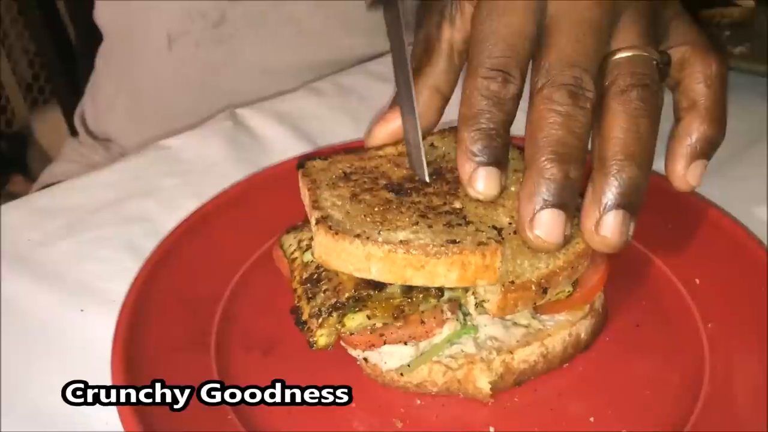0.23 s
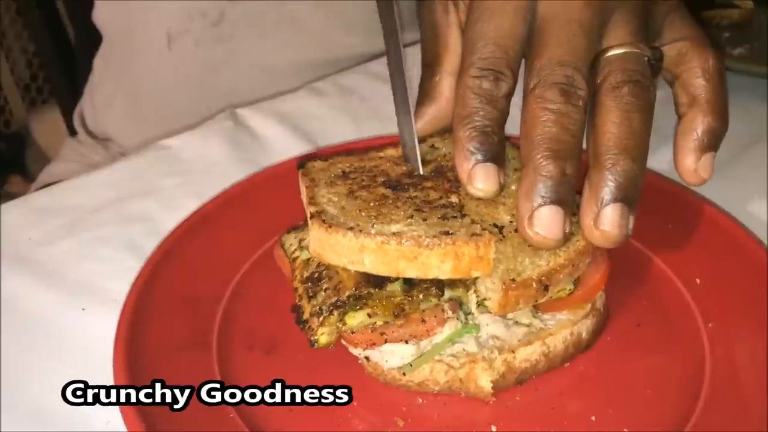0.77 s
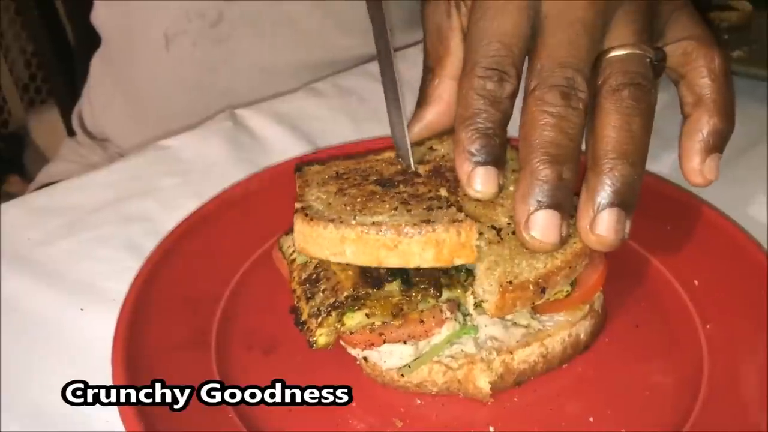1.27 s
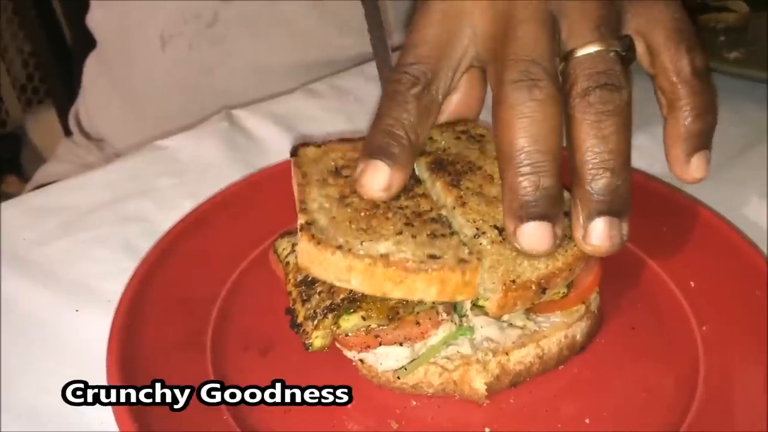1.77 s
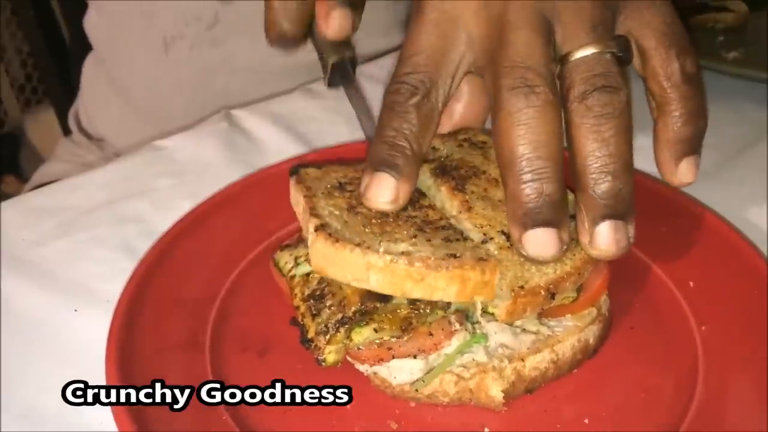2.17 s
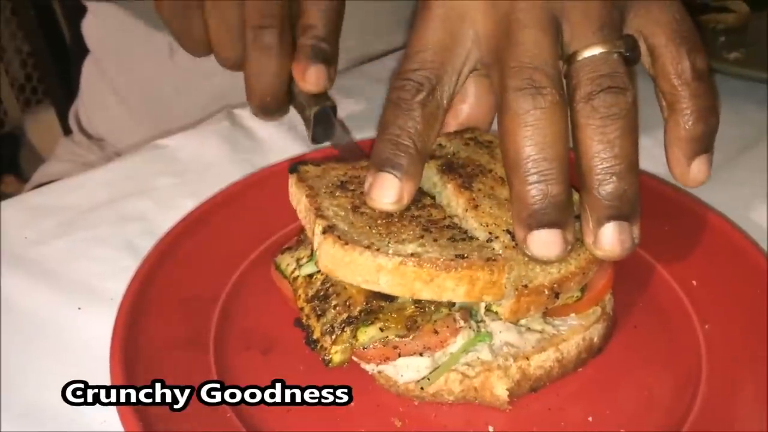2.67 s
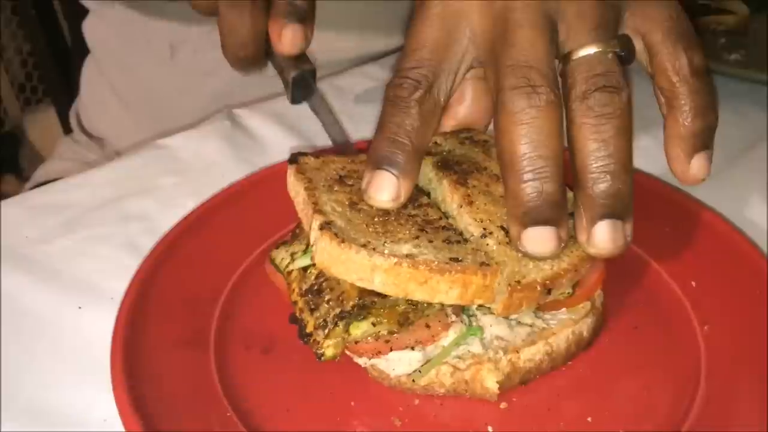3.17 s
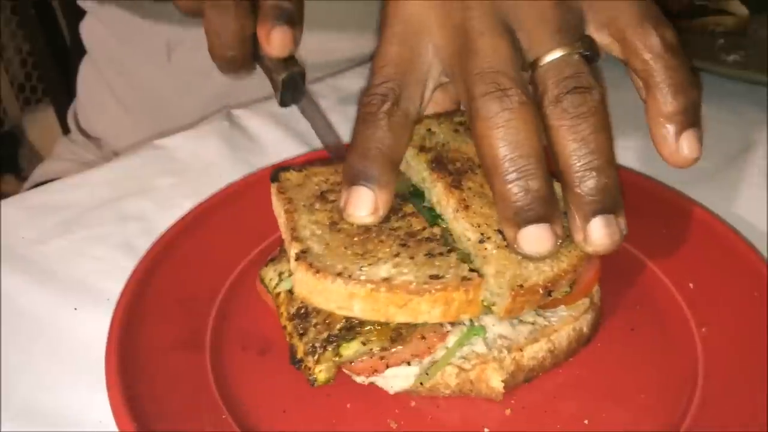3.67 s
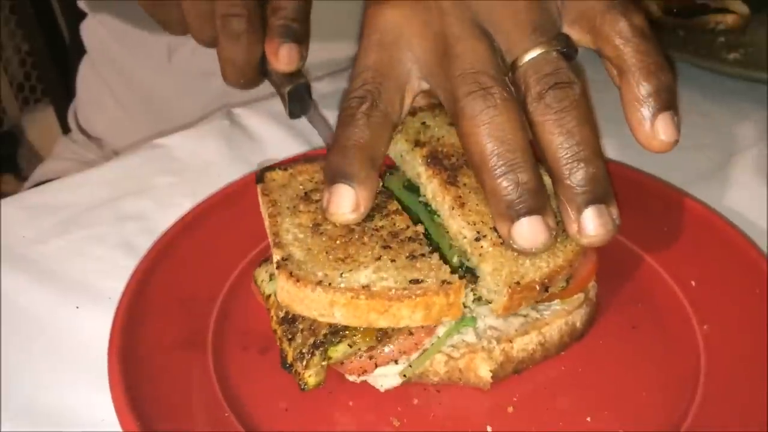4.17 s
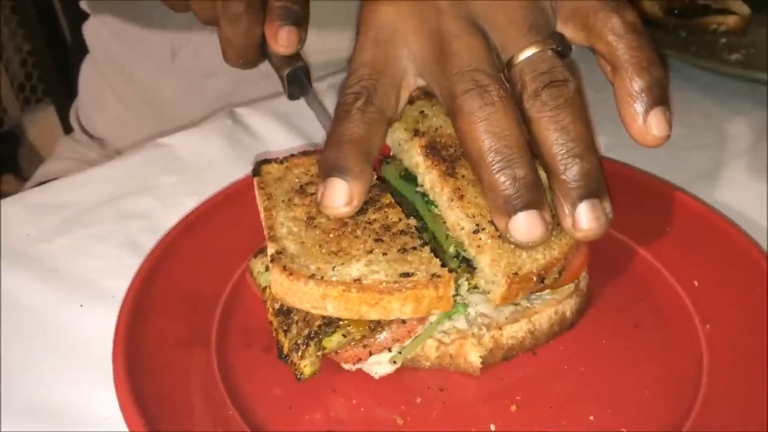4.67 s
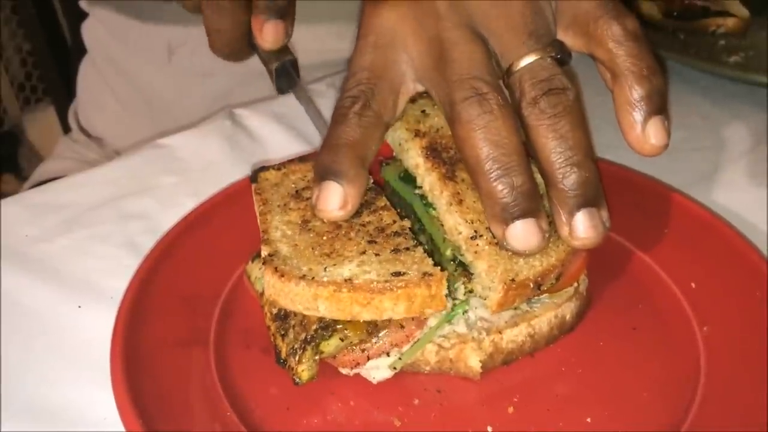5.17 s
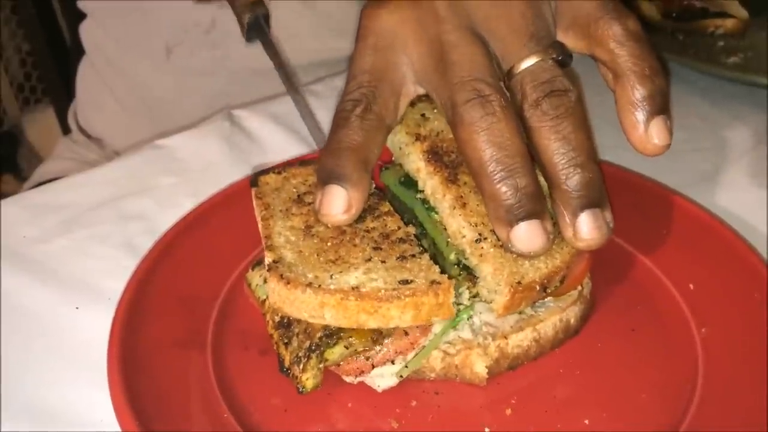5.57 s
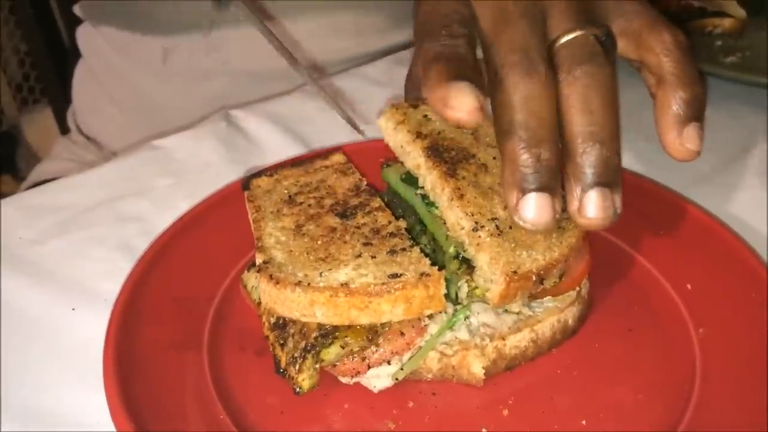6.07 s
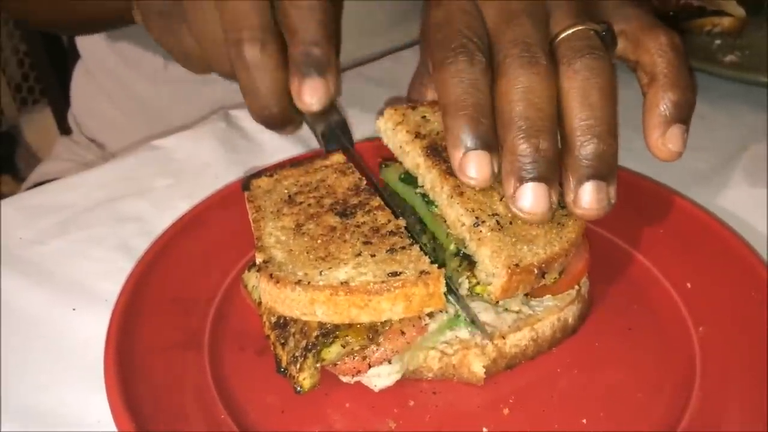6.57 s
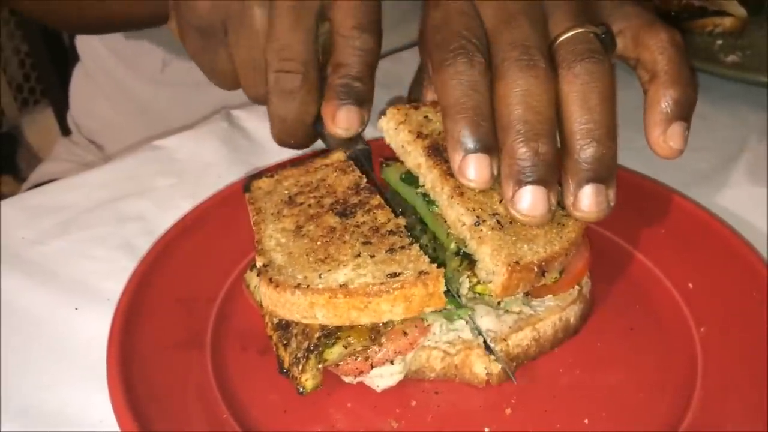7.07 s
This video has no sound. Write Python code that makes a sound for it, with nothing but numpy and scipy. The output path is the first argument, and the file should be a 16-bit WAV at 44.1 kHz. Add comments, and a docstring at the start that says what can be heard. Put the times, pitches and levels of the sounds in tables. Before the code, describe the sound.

Close up in a quiet kitchen, a knife saws through a toasted sandwich in short, uneven strokes, the crust crackling and snapping. The blade then reaches the ceramic plate and ticks and scrapes on it, with several sharp, ringing steel clinks, one brief screech and soft thumps on the tablecloth. A few faint ticks finish the cut. A low appliance rumble and faint electrical hum continue underneath.

```python
"""Sawing through a toasted sandwich

A knife saws through a toasted sandwich on a ceramic plate in a quiet kitchen. First the crust crumbles
and snaps under the teeth; then the blade reaches the plate and scrapes and ticks on it. Harder blows
set the steel ringing, and once it screeches over the glaze. Plate and bread thump softly on the cloth.
Under it all lies a steady appliance rumble with a mains hum."""
import sys
import numpy as np
from scipy import signal
from scipy.io import wavfile

SR = 44100
rng = np.random.default_rng(int(sys.argv[2]) if len(sys.argv) > 2 else 0)


def file_out(sig):
    """Save sig as 16-bit WAV at sys.argv[1]."""
    # one column per channel
    cols = np.atleast_2d(sig).T
    # limit, then scale
    lim = np.clip(cols, -1, 1)
    pcm = np.round(lim * 32767).astype(np.int16)
    wavfile.write(sys.argv[1], SR, pcm)


N = 322812
BLADE_ON_PLATE_S = 2.62
# The cutting has three layers: crunch (550-2000 Hz), grit (2-8 kHz) and fizz (above about 8 kHz).

# Tone curve of the appliance rumble: pitch_hz, relative_density_db
RUMBLE_SPECTRUM = [(22, -36.5), (31, -2), (50, -5.5), (65, 6), (100, 3), (250, 2.5), (400, -1),
                   (1000, -1.5), (1600, -8), (2500, -22), (4000, -40), (8000, -30.5), (13000, -37),
                   (16000, -42.5)]
# Partials of the mains hum: pitch_hz, level_db
HUM_PARTIALS = [(60, -72.5), (120, -64.5)]
# The hand keeps the bread rustling between strokes: time_s, grit_db, fizz_db
BREAD_RUSTLE = [(0, -65, -71), (2.398, -68, -81), (5.7, -66, -80), (6.001, -72, -88.5), (7.32, -68, -79.5)]
# Strokes of the knife: start_s, hold_s, grit_db, fizz_over_grit_db
KNIFE_STROKES = [(0.127, 0.044, -66, -3), (0.279, .04, -56.5, 2.5), (0.351, 0.044, -45.5, -1),
                 (0.429, 0.032, -56, -2), (0.658, 0.027, -53.5, -2.5), (.82, .02, -60, -7),
                 (0.876, .04, -48, 3), (0.949, 0.031, -46, -0.5), (1.194, 0.054, -52.5, -3),
                 (1.415, 0.065, -46.5, -8.5), (1.522, .03, -57, -9.5), (1.787, 0.054, -59, 3),
                 (1.969, 0.0075, -57, 4.5), (2.102, 0.011, -55, 5), (2.219, 0.045, -56, -2),
                 (2.322, 0.0062, -62.5, 1), (2.445, .02, -62.5, -7), (2.649, .03, -63, -5.5),
                 (2.712, 0.028, -62, -8), (2.808, 0.014, -51.5, -1), (2.862, 0.0068, -41.5, -16),
                 (2.963, 0.011, -37.5, -18), (3.109, .03, -61, -11), (3.341, 0.046, -56.5, -9.5),
                 (3.433, 0.006, -39.5, -0.5), (3.509, 0.0076, -57, -20), (3.639, .02, -55, -15),
                 (3.698, .02, -56, -6.5), (3.97, 0.014, -58.5, -6), (4.18, 0.017, -56.5, -11),
                 (4.432, .02, -63, -15), (4.632, .03, -59.5, -3.5), (4.69, .015, -56, -6),
                 (4.787, 0.006, -43.5, -8), (4.863, 0.043, -42, -21), (4.935, 0.0033, -33, -3.5),
                 (4.981, 0.057, -38.5, -19.5), (5.197, 0.022, -49.5, -20), (5.318, 0.023, -49, -16),
                 (5.491, 0.037, -45.5, -29), (5.592, 0.0043, -37.5, -29), (6.46, .02, -65, -7),
                 (6.546, .04, -67, -23.5), (6.784, .015, -62, -3), (7.123, 0.022, -58, -18),
                 (7.292, 0.023, -60, -4)]
# Featured snaps of the crust: start_s, grit_peak_db, pitch_hz, fizz_over_grit_db
CRUST_SNAPS = [(.0355, -44.5, 4000, 2), (.0494, -40, 2740, 1), (.1283, -31.5, 4330, 0.5),
               (.1617, -31, 6100, 1), (.2888, -39.5, 3320, 7), (.3163, -38, 3500, 7),
               (.3227, -26, 2750, -2.5), (.3523, -24, 2600, -14.5), (.358, -33.5, 2400, -0.5),
               (.3762, -31, 4570, 1), (.3973, -35.5, 4770, 9), (.401, -31, 6300, 0),
               (.4639, -33.5, 4260, -11), (.8174, -43.5, 4750, 2), (.855, -42.5, 4390, -9),
               (.8688, -28, 4420, -1), (.8846, -34, 6400, -6.5), (.8888, -26, 5630, 0.5),
               (.9103, -28.5, 4870, -0.5), (.9173, -37, 4500, -5), (.9451, -33, 4160, -11),
               (.9571, -29, 4760, 3.5), (.9799, -29.5, 4650, 6), (.9843, -34, 4590, -5),
               (1.1195, -43.5, 4610, 8), (1.1746, -36.5, 5130, -1.5), (1.2053, -40, 2680, -1),
               (1.2319, -29.5, 3110, 3.5), (1.3883, -26.5, 4030, -8), (1.3918, -28.5, 4430, -10.5),
               (1.4079, -28, 4930, 2.5), (1.4211, -29, 4600, -13.5), (1.4272, -25.5, 4900, -4.5),
               (1.4364, -28.5, 3160, -1), (1.4503, -32, 4120, -15), (1.461, -40, 5020, -8),
               (1.4675, -23, 5500, -2), (1.4715, -17.5, 5970, -14), (1.4907, -18.5, 5250, -13),
               (1.496, -30, 4090, 3), (1.5129, -31.5, 5650, 1), (1.5501, -35, 3580, -12),
               (1.6653, -45, 6300, -2.5), (1.7643, -33.5, 3570, 5.5), (1.8092, -43.5, 5920, -2),
               (1.9237, -44.5, 5470, -4), (1.9533, -36, 4460, 5.5), (2.0371, -34.5, 4480, -10),
               (2.0732, -26, 4060, 0), (2.1051, -29.5, 4030, -14), (2.1106, -28.5, 4240, -1),
               (2.1779, -32.5, 4800, 2.5), (2.1888, -51.5, 4350, 8), (2.2074, -31, 6660, -7),
               (2.2131, -30.5, 4200, 0), (2.2527, -31.5, 5500, -7), (2.2575, -41, 4730, -3.5),
               (2.3199, -36, 6430, -14), (2.3293, -38.5, 6160, 2.5)]
# Featured ticks of the blade on the plate: start_s, grit_peak_db, pitch_hz, fizz_over_grit_db
PLATE_TICKS = [(2.6651, -42, 5300, -8), (2.7181, -32, 6350, -15.5), (2.8066, -33.5, 5440, -5.5),
               (2.8254, -32.5, 4650, -10), (2.867, -33, 3550, -15), (2.9173, -23, 2970, -18.5),
               (2.9211, -23, 2530, -19), (2.9486, -10, 3920, -22), (2.9602, -5, 3760, -37),
               (3.0946, -47, 5110, 0), (3.3053, -44.5, 3010, -21.5), (3.3459, -37.5, 5640, -6),
               (3.3822, -41, 2770, -10), (3.3968, -30, 2580, -22), (3.4186, -41, 3020, -13.5),
               (3.4265, -18, 3050, -37.5), (3.4396, -18, 4350, -23), (3.4791, -21.5, 3300, -35),
               (3.6362, -36.5, 2590, -4.5), (3.684, -34, 3510, -29.5), (4.1605, -41.5, 3960, -21.5),
               (4.5204, -31.5, 5420, -12.5), (4.6787, -40.5, 4970, -13), (4.6926, -39, 3300, -10.5),
               (4.7017, -36.5, 3350, -11), (4.7505, -39, 4400, -9.5), (4.771, -33, 4050, -7.5),
               (4.785, -24, 2800, -27), (4.8336, -36.5, 2420, -8), (4.8761, -31.5, 2760, -17.5),
               (4.8909, -28, 2960, -1), (4.9015, -20.5, 3860, -23.5), (4.9056, -23, 2480, -21),
               (4.933, -6.5, 4530, -14), (4.9533, -24.5, 3210, -25), (4.9753, -8.5, 3950, -39),
               (5.0164, -18, 4260, -32), (5.0299, -22.5, 4150, -17.5), (5.0562, -20.5, 4010, -32),
               (5.1928, -31.5, 4250, -17), (5.2135, -31.5, 3360, -12), (5.2541, -40, 2570, -11.5),
               (5.3138, -35, 2520, -8), (5.3429, -33, 3710, -17), (5.3527, -32.5, 2530, -15.5),
               (5.4558, -31.5, 3390, -20), (5.514, -23.5, 4010, -18.5), (5.5323, -30.5, 2630, -12.5),
               (5.5379, -32, 2620, -13), (5.5866, -20.5, 2640, -27), (5.5983, -22, 4040, -27),
               (5.6071, -30, 2440, -29), (5.688, -40.5, 2590, -4.5), (6.7633, -37.5, 3520, -10),
               (6.7928, -37, 4810, -8), (6.9728, -43.5, 5400, 2), (7.0122, -44.5, 2830, 2.5),
               (7.0844, -31.5, 4900, -7), (7.1166, -24, 3250, -18), (7.1866, -40, 2840, -2.5),
               (7.3165, -41, 2410, -11)]
# Modes of the plate, held down by hand and bread: pitch_hz, base_width_hz, gain_db
PLATE_MODES = [(688, 11, 1.5), (2070, 30, -20), (2430, 87, 3), (3075, 62, -4), (3632, 27, -4),
               (4190, 69, -18.5), (4865, 39, -6), (5460, 45, 4.5), (6340, 360, -6.5), (7460, 70, -14.5),
               (8250, 570, -7), (9520, 63, -25), (10300, 84, -16), (12400, 63, -15.5)]
# Plate and bread thumping on the cloth: start_s, level_db, pitch_hz, t60_s
CLOTH_THUMPS = [(0.411, -40.5, 165, 0.15), (1.45, -37, 210, 0.095), (1.526, -35.5, 144, 0.051),
                (1.639, -44, 211, 0.14), (2.076, -21, 360, 0.0096), (2.865, -30.5, 663, 0.086),
                (2.947, -30.5, 354, 0.082), (2.962, -33, 230, 0.19), (3.485, -41.5, 214, 0.2),
                (3.47, -36.5, 704, 0.12), (4.935, -19.5, 269, 0.05), (4.939, -28, 683, .08),
                (4.974, -34, 175, 0.35), (5.603, -35, 706, 0.024)]
# Blows that ring the blade: start_s, peak_db, pressure (0-1), ring_share (0-1), contact_s, clack_re_peak_db
BLADE_BLOWS = [(2.9615, -7.5, 0.93, 0.083, 0.00045, -35), (3.4375, -42, 0.85, 0.31, 0.00083, -23),
               (3.4795, -25.5, 0, 0.21, 0.0012, -27), (3.516, -34.5, 0.05, 0.52, 0.004, -21.5),
               (4.9742, -4.5, 0.81, 0.3, 0.0011, -22), (5.034, -19, 0.72, 0.49, 0.0032, -13),
               (5.055, -17.5, 0.53, 0.22, 0.002, -5), (5.483, -24, 0.4, 0.45, 0.00066, -20.5),
               (5.7005, -8.5, 0.07, 0.88, 0.0017, -3.5)]
# Bending modes of the blade: free_hz, free_db, pressed_hz, pressed_db, full_t60_s
BLADE_MODES = [(662, -31, 680, -30, .2), (1453, -36, 1460, -36, .2), (2315, -3, 2309, -22, .21),
               (3268, 0, 3252, -13, .15), (4362, 2, 4495, 2, .11), (5609, -18, 5690, -7, .14),
               (6300, -48, 6412, -19, .09), (6993, -24, 7090, -24, .22), (7623, -48, 7687, -32, .15),
               (8522, -23, 8613, -20, .14), (9500, -48, 9577, -28, .09), (10190, -24, 10240, -24, .13),
               (12000, -30, 12030, -21, .12), (12500, -45, 12560, -30, .07), (13940, -33, 14040, -19, .08)]
# Envelope of the pressed blade screeching over the glaze: time_s, level_db
SCREECH_ENVELOPE = [(4.975, -60), (4.985, -34), (5.01, -31), (5.04, -36), (5.06, -54), (5.073, -65)]


def from_db(db):
    """Gain for a level in dB."""
    return 10 ** (np.asarray(db) / 20)


def rms_one(x):
    """Normalises to rms 1."""
    return x / np.sqrt(np.mean(x ** 2) + 1e-20)


def peak_one(x):
    """Normalises to peak 1."""
    return x / np.max(np.abs(x))


def band(x, low_hz, high_hz):
    """Gentle band-pass."""
    return signal.sosfilt(signal.butter(2, [low_hz, high_hz], "band", fs=SR, output="sos"), x)


def resonance(x, hz, width_hz):
    """Two-pole resonator with unity gain at its peak."""
    r = np.exp(-np.pi * width_hz / SR)
    gain = (1 - r * r) / 2
    return signal.lfilter([gain, 0, -gain], [1, -2 * r * np.cos(2 * np.pi * hz / SR), r * r], x)


def drift(rate_hz):
    """Smooth random modulation with rms 1."""
    r = np.exp(-2 * np.pi * rate_hz / SR)
    return rms_one(signal.lfilter([1], [1, -2 * r, r * r], rng.standard_normal(N + SR))[SR:])


def add(out, start_s, sound):
    """Drops a short sound onto the track."""
    at = round(start_s * SR)
    out[at:at + len(sound)] += sound[:N - at]


def three_bands(x, tilt_hz):
    """Splits into crunch, grit and fizz; the outer bands are flipped so that the crossovers add up."""
    r = np.exp(-2 * np.pi * tilt_hz / SR)
    grit = signal.lfilter([1 - r], [1, -r], band(x, 2000, 8000))
    return -band(x, 550, 2000), grit, -band(band(x, 7500, 18000), 5000, 14000)


def room_tone():
    """The kitchen bed: appliance rumble in flickering third-octave bands, and a wavering mains hum."""
    edges_hz = 22 * 2 ** np.arange(0, 9.7, 1 / 3)
    curve_hz, curve_db = np.transpose(RUMBLE_SPECTRUM)
    white = rng.standard_normal((2, N + SR))
    flicker = [drift(8.1), drift(17), drift(11)]
    rumble, t = np.zeros(N), np.arange(N) / SR
    for k, (low, high) in enumerate(zip(edges_hz, edges_hz[1:])):
        level_db = np.interp(np.log(low * high) / 2, np.log(curve_hz), curve_db)
        flicker_db = (1 + 81 / low) ** 0.47 * flicker[k % 3]   # the lows move most
        rumble += from_db(level_db + flicker_db) * band(white[k % 2], low, high)[SR:]
    hum = sum(from_db(db + 3 + 3.5 * drift(15)) * np.sin(2 * np.pi * hz * t) for hz, db in HUM_PARTIALS)
    return from_db(-53) * rms_one(rumble) + hum


def stroke_levels(t):
    """Grit and fizz envelopes in dB: each stroke swells, holds and dies, adding power to the rustle."""
    rise_db_per_s, fall_db_per_s, fizz_steepness = 336, 266, 3.9
    times_s, *rustle_db = np.transpose(BREAD_RUSTLE)
    grit_power, fizz_power = [from_db(2 * np.interp(t, times_s, db)) for db in rustle_db]
    for start_s, hold_s, grit_db, fizz_db in KNIFE_STROKES:
        before_s, after_s = np.maximum(start_s - t, 0), np.maximum(t - start_s - hold_s, 0)
        down_db = np.minimum(rise_db_per_s * before_s + fall_db_per_s * after_s, 100)
        grit_power += from_db(2 * (grit_db - down_db))
        fizz_power += from_db(2 * (grit_db + fizz_db - fizz_steepness * down_db))
    return 10 * np.log10(grit_power), 10 * np.log10(fizz_power)


def grains(per_s, spread_db):
    """Tiny fractures of uneven size, arriving in clumps over a fine hiss that swells with them."""
    sizes = from_db(spread_db * np.minimum(rng.exponential(1, N), 4)) * rng.choice([-1, 1], N)
    clumps = drift(30)
    breaks = rng.random(N) < per_s * from_db(5 * clumps) / SR
    return rms_one(sizes * breaks) + .45 * from_db(3 * clumps) * rng.standard_normal(N)


def held_plate(x, ring_db):
    """The dry contact sound plus the damped plate modes that it drives."""
    modes = sum(from_db(db) * (-1) ** k * resonance(x, hz, width_hz + 15)
                for k, (hz, width_hz, db) in enumerate(PLATE_MODES))
    return x + from_db(ring_db) * modes


def sawing():
    """Crumbs break all along the stroke; once the blade is through and bears down, the plate colours them."""
    t = np.arange(N) / SR
    grit_db, fizz_db = [np.interp(t, t[::32], db) for db in stroke_levels(t[::32])]
    crumbs = grains(per_s=1500, spread_db=3.5)
    on_plate = t > BLADE_ON_PLATE_S
    bearing = on_plate * np.clip((grit_db + 64) / 14, 0, 1)
    crunch_db = grit_db + np.where(on_plate, -11, -5)   # soft bread sounds deeper than the hard plate
    loose = three_bands(crumbs, tilt_hz=2930)
    pressed = three_bands(held_plate(crumbs, ring_db=12.5), tilt_hz=6000)
    return sum(from_db(level_db) * ((1 - bearing) * rms_one(plain) + bearing * rms_one(ringing))
               for plain, ringing, level_db in zip(loose, pressed, [crunch_db, grit_db, fizz_db]))


def small_cracks(count):
    """Cues for small random cracks that crowd into strong strokes and follow their level and fizz."""
    when, pitch, size, brightness = rng.random((count, 4)).T
    t = np.arange(0, N, 32) / SR
    density = from_db(.7 * np.minimum(stroke_levels(t)[0], -48))
    progress = np.cumsum(density)
    start_s = np.interp(when, progress / progress[-1], t)
    grit_db, fizz_db = stroke_levels(start_s)
    peak_db = grit_db + 7.5 + 4 * np.log(size + 0.018)
    fizz_over_grit_db = fizz_db - grit_db + 3.4 + 12 * (brightness - .5)
    return np.c_[start_s, peak_db, 2500 + 3700 * pitch, fizz_over_grit_db]


def loose_crumbs(count):
    """Cues for loose crumbs: faint, very bright pinpricks scattered over the whole scene."""
    when, pitch, size = rng.random((count, 3)).T
    peak_db = -58.5 + 6.5 * np.log(size + .02)
    fizz_over_grit_db = np.full(count, 10)
    return np.c_[when * N / SR, peak_db, 4000 + 3000 * pitch, fizz_over_grit_db]


def cracks(cues, crunch_db, crunch_slope, scatter_db, ring_db, broadband, base_t60_s):
    """Each crack is a sharp noise burst with its own pitch, crunch and fizz; big ones last longer."""
    out, t = np.zeros(N), np.arange(1024) / SR
    offsets_db = scatter_db * rng.standard_normal(len(cues))
    for (start_s, peak_db, hz, fizz_db), offset_db in zip(cues, offsets_db):
        t60_s = base_t60_s * from_db(0.033 * (peak_db + 32.5))
        burst = rng.standard_normal(len(t)) * from_db(-60 * t / t60_s)
        crunch, grit, fizz = three_bands(held_plate(burst, ring_db), tilt_hz=5000)
        crunch = from_db(crunch_db + crunch_slope * (peak_db + 35) + offset_db) * peak_one(crunch)
        grit = peak_one(broadband * grit + resonance(grit, hz, 0.45 * hz))
        fizz = from_db(fizz_db) * peak_one(fizz)
        add(out, start_s, from_db(peak_db) * (crunch + grit + fizz))
    return out


def crust_snaps(cues):
    """Crust breaks under the teeth: broad, crunchy cracks with only a hint of plate."""
    return cracks(cues, crunch_db=-6, crunch_slope=-.05, scatter_db=4,
                  ring_db=-6, broadband=.4, base_t60_s=.007)


def near_echoes(x):
    """Table, hands and walls return a few short, dull reflections."""
    out, t60_s = np.zeros(N), 0.056
    lags = (rng.uniform(.002, 0.02, 14) * SR).astype(int)
    for k, lag in enumerate(lags):
        out[lag:] += (-1) ** k * from_db(-60 * lag / SR / t60_s) * x[:-lag]
    return band(out, 300, 11000)


def cloth_thumps():
    """Plate and bread push into the cloth: a low, dying tone in a dull puff of noise."""
    out, t = np.zeros(N), np.arange(SR // 4) / SR
    attack = np.minimum(t / .002, 1)
    for start_s, level_db, hz, t60_s in CLOTH_THUMPS:
        puff = rms_one(band(rng.standard_normal(len(t)), 100, 360))
        push = 0.54 * np.sin(2 * np.pi * hz * t) + 0.51 * puff
        add(out, start_s, from_db(level_db - 60 * t / t60_s) * push * attack)
    return out


def plate_ticks(cues):
    """The blade ticks on the plate: thinner, more pitched cracks with a ceramic ring."""
    return cracks(cues, crunch_db=-10, crunch_slope=-.22, scatter_db=4.5,
                  ring_db=2.5, broadband=.1, base_t60_s=.0078)


def ringing_blade():
    """Blows ring the steel, each opening with a broad clack; pressure stiffens it and shifts its modes."""
    out, t = np.zeros(N), np.arange(SR // 2) / SR
    free_hz, free_db, pressed_hz, pressed_db, full_t60_s = np.transpose(BLADE_MODES)[:, :, None]
    variations = rng.standard_normal((len(BLADE_BLOWS), 2, len(BLADE_MODES), 1))
    for blow, (strength, phase) in zip(BLADE_BLOWS, variations):
        start_s, peak_db, pressure, ring_share, contact_s, clack_db = blow
        hz = free_hz + pressure * (pressed_hz - free_hz)
        level_db = free_db + pressure * (pressed_db - free_db) + 0.19 * strength
        decay_db = 60 * t / (full_t60_s * ring_share)
        modes = from_db(level_db - decay_db) * np.sin(2 * np.pi * hz * t + phase)
        ring = peak_one(modes.sum(axis=0) * np.minimum(t / contact_s, 1))
        burst = rng.standard_normal(len(t)) * from_db(-60 * t / 0.015)
        clack = peak_one(band(burst, 1800, 4900))
        add(out, start_s, from_db(peak_db) * (ring + from_db(clack_db) * clack))
    return out


def glaze_screech():
    """Juddering friction on the glaze keeps the pressed blade singing, with a rough rub around it."""
    times_s, level_db = np.transpose(SCREECH_ENVELOPE)
    envelope = from_db(np.interp(np.arange(N) / SR, times_s, level_db, left=-120, right=-120))
    rub = grains(per_s=1500, spread_db=3)
    modes = sum(from_db(db) * rms_one(resonance(rub, hz, 7 / t60_s))
                for _, _, hz, db, t60_s in BLADE_MODES)
    return envelope * (rms_one(modes) + .3 * rms_one(band(rub, 3000, 6200)))


def scene():
    """Mono mix: knife, bread and plate up close, the kitchen behind."""
    small = small_cracks(count=220)
    on_plate = small[:, 0] > BLADE_ON_PLATE_S
    crust = crust_snaps([*CRUST_SNAPS, *small[~on_plate], *loose_crumbs(count=90)])
    ticks = plate_ticks([*PLATE_TICKS, *small[on_plate]])
    close = sawing() + crust + ticks + ringing_blade() + glaze_screech()
    return (close + from_db(-19.5) * near_echoes(close) + cloth_thumps() + room_tone())[None]


def record(dry):
    """A steep low-pass takes off the very top."""
    cutoff_hz = 15900
    return signal.sosfilt(signal.ellip(10, .5, 80, cutoff_hz, fs=SR, output="sos"), dry)


dry = scene()
out = record(dry)
file_out(out)
```